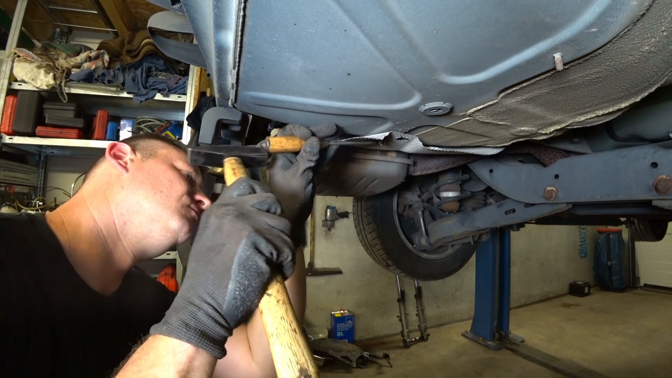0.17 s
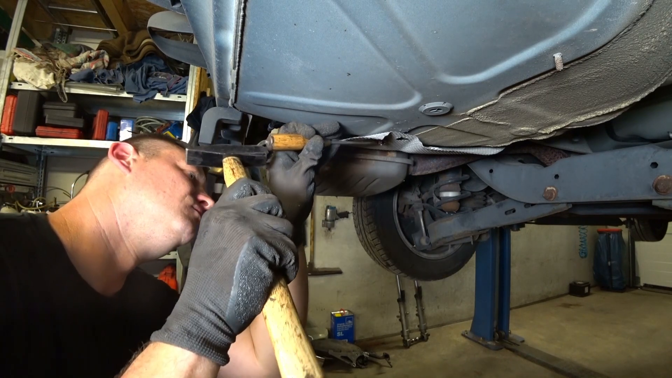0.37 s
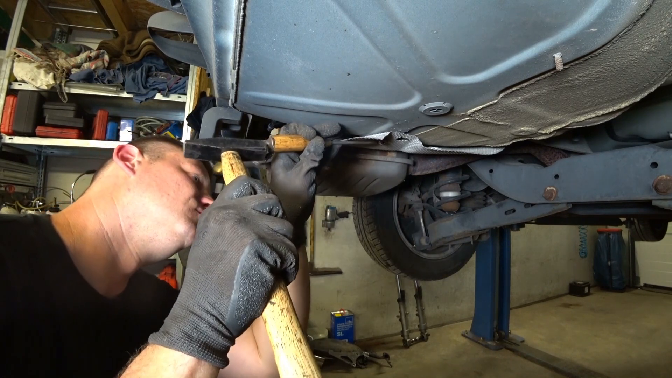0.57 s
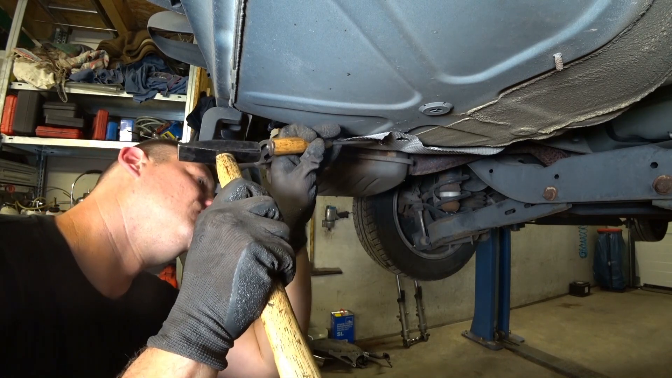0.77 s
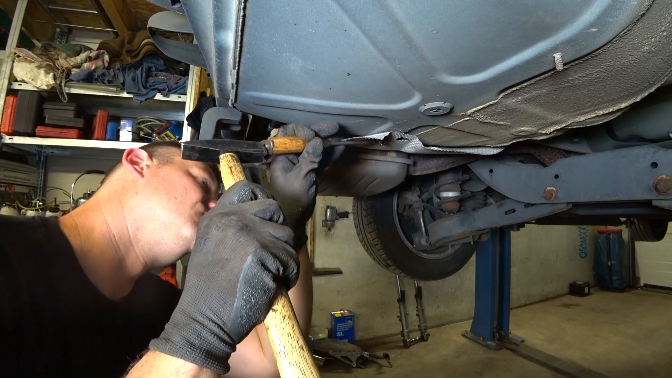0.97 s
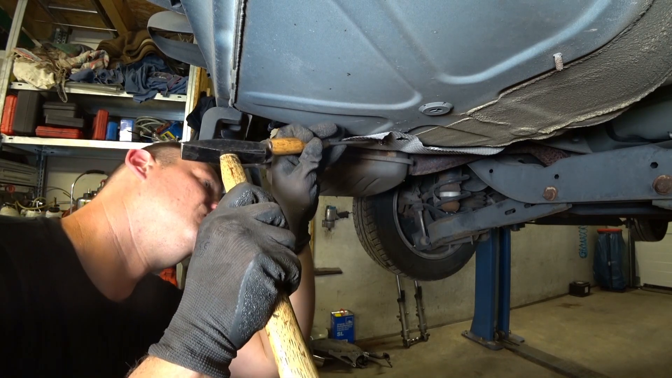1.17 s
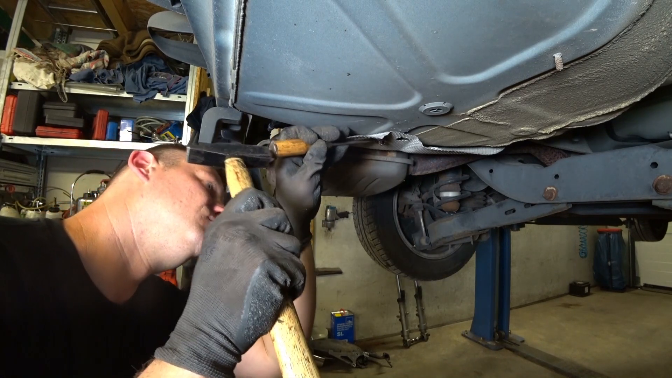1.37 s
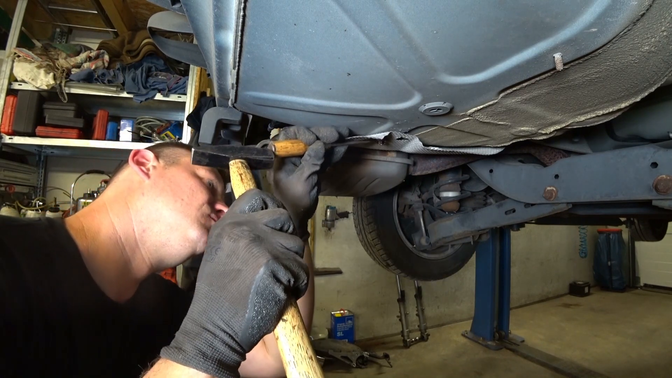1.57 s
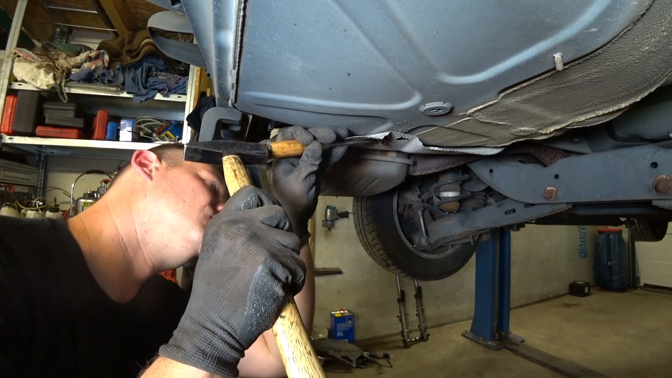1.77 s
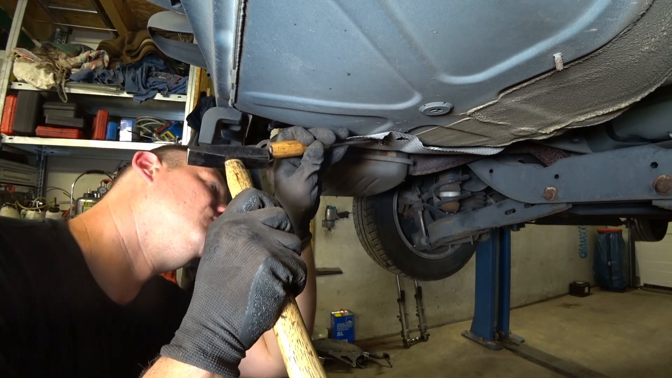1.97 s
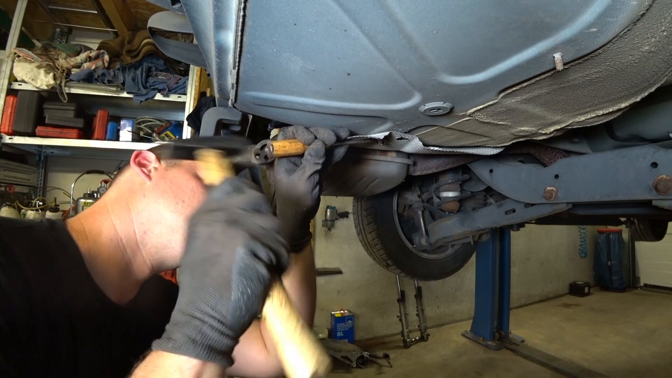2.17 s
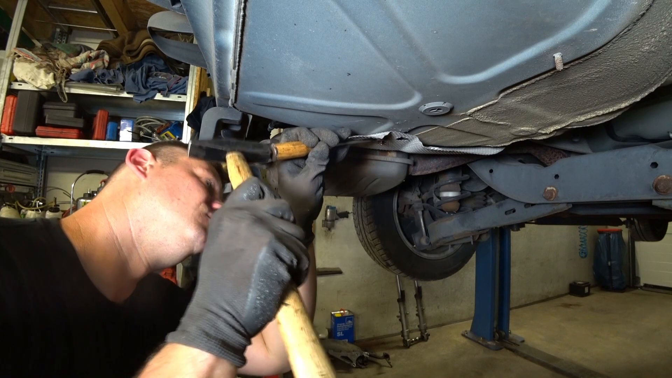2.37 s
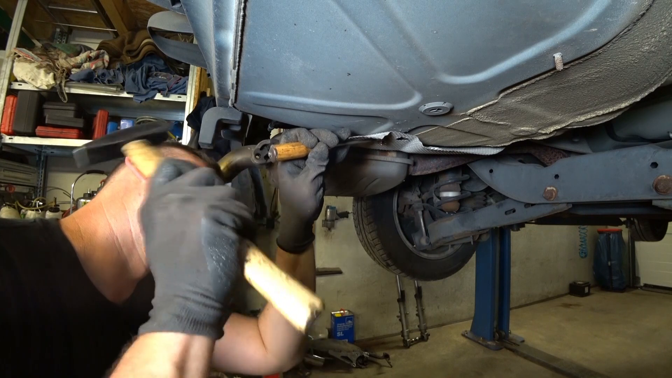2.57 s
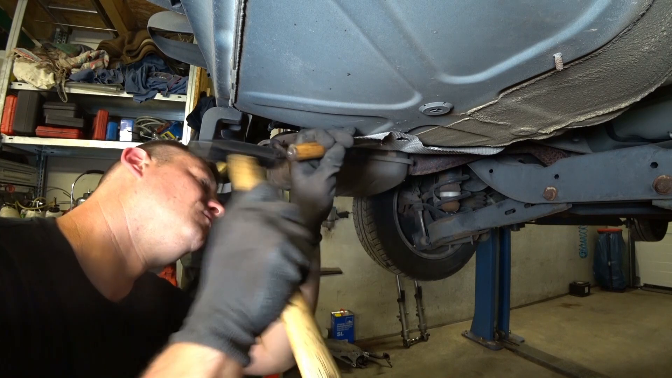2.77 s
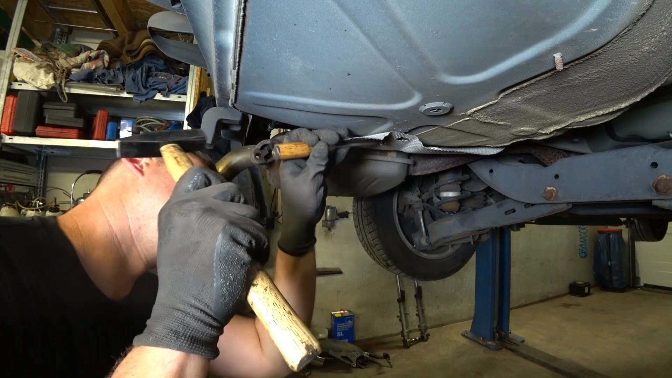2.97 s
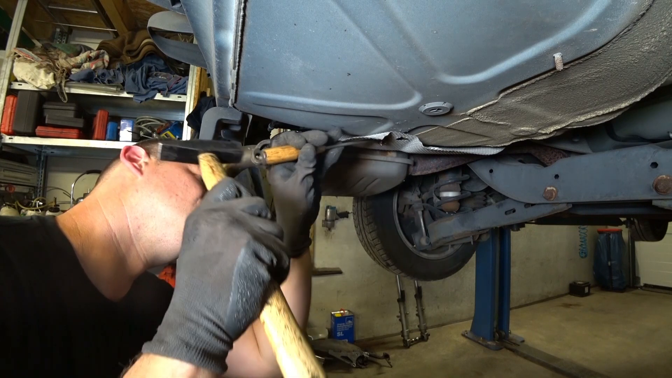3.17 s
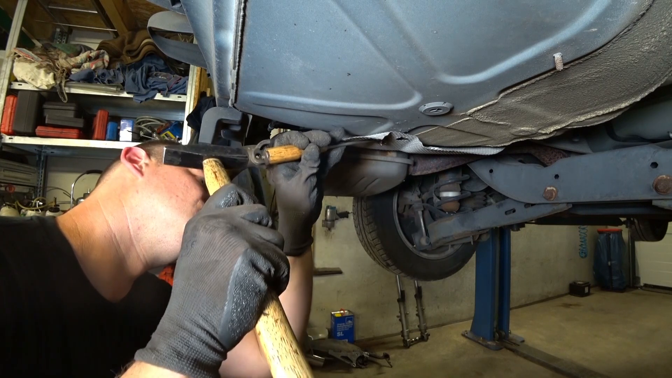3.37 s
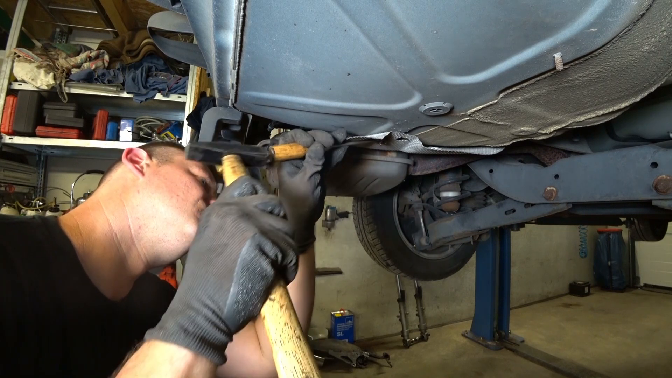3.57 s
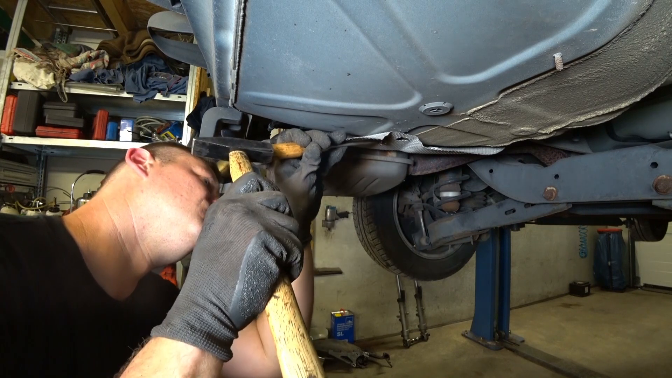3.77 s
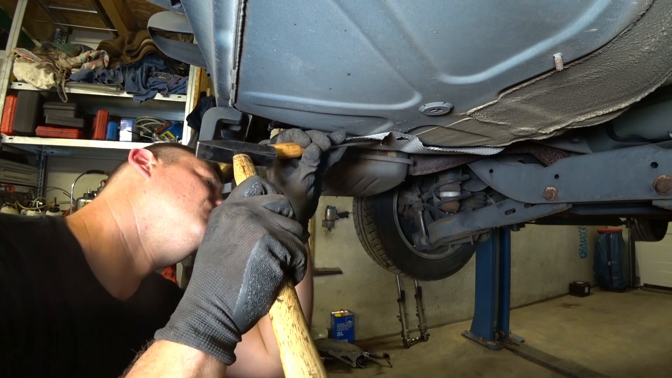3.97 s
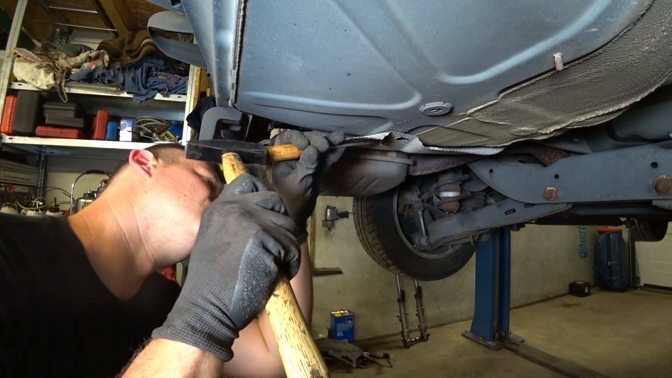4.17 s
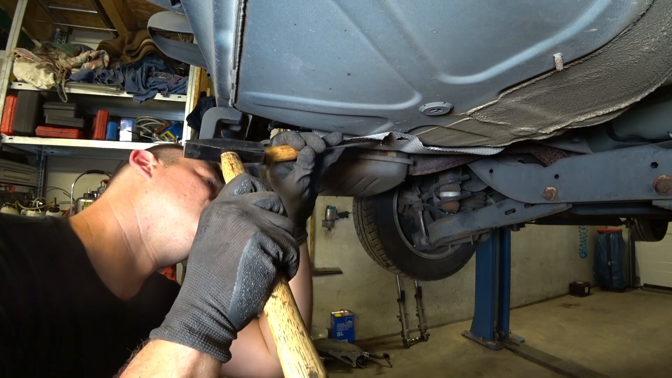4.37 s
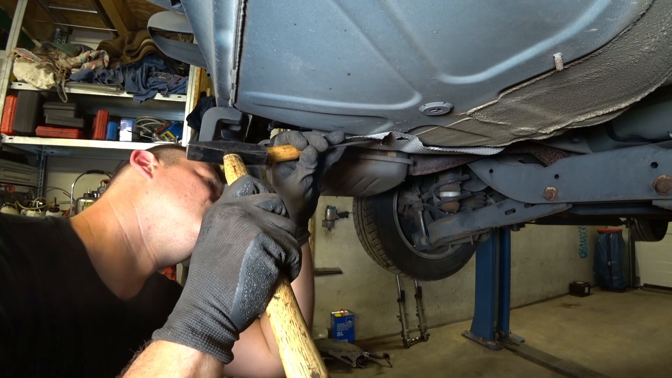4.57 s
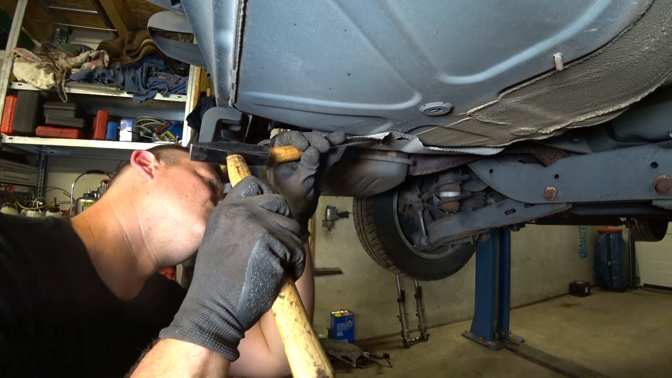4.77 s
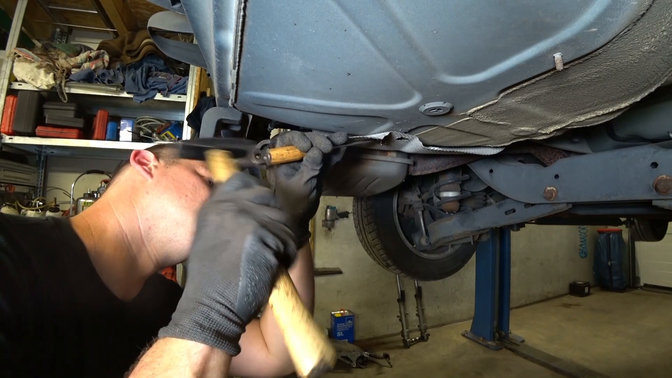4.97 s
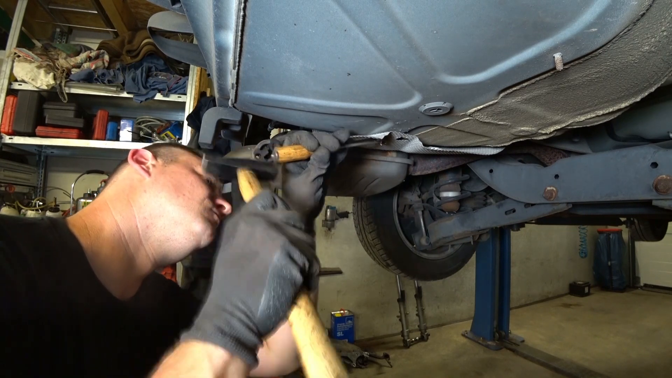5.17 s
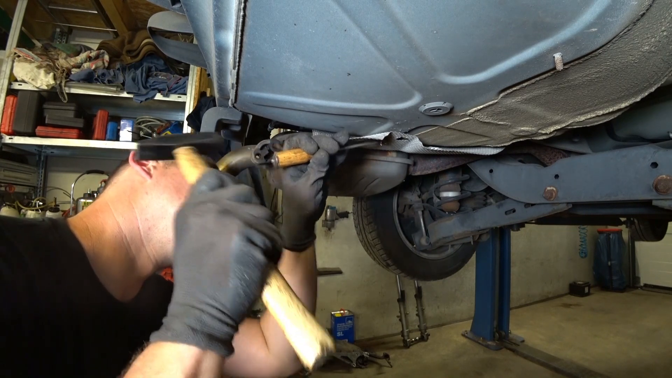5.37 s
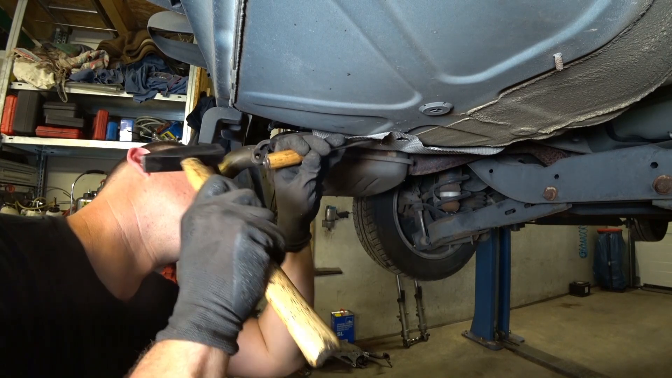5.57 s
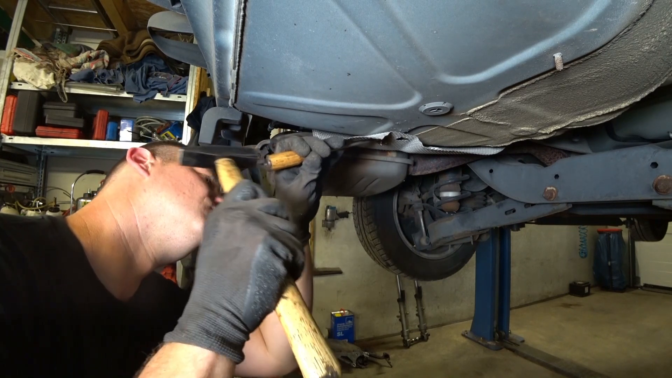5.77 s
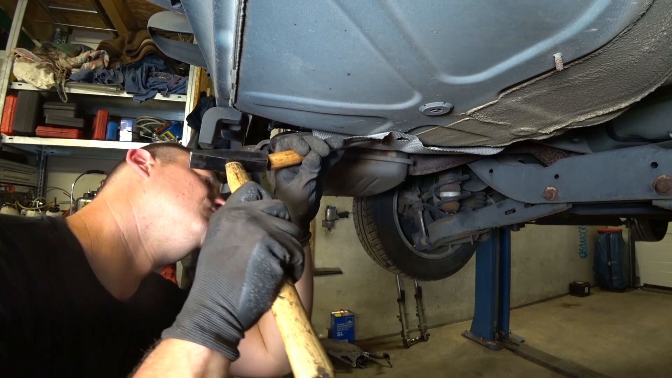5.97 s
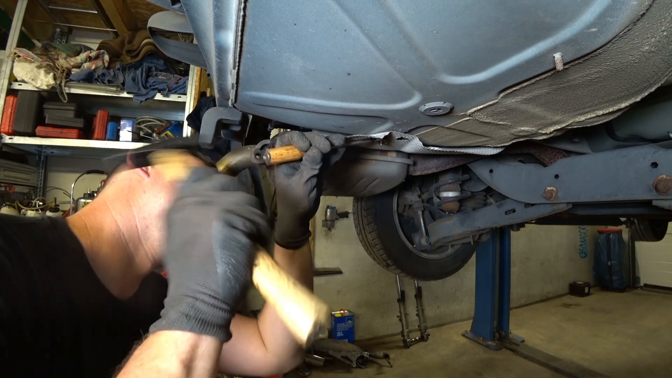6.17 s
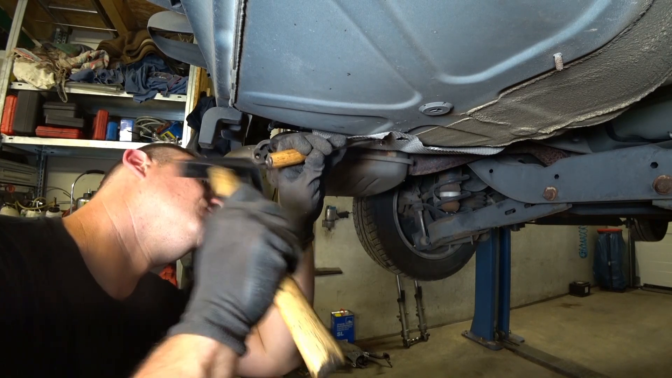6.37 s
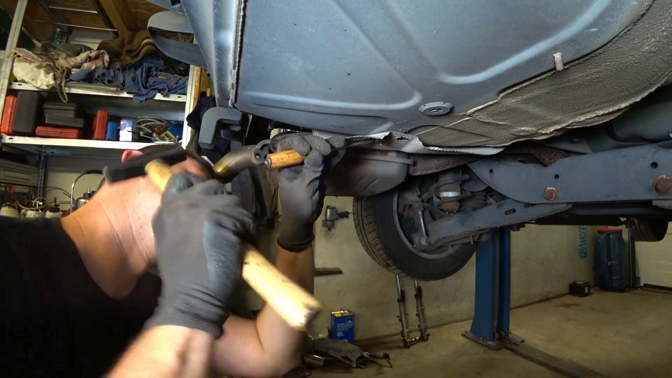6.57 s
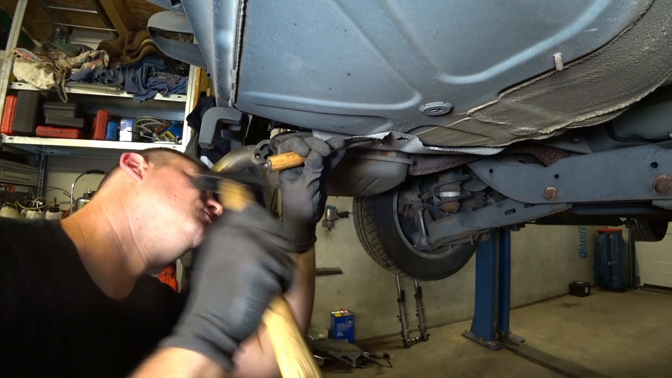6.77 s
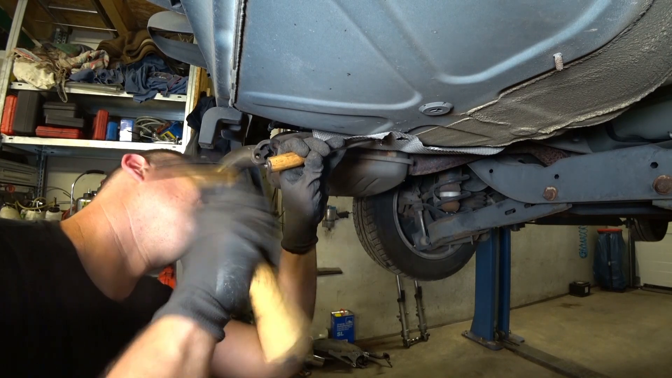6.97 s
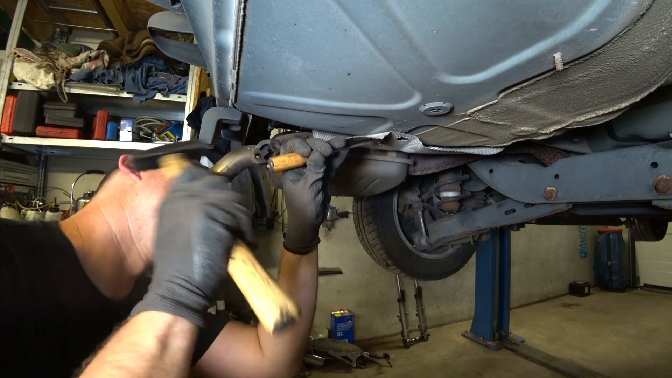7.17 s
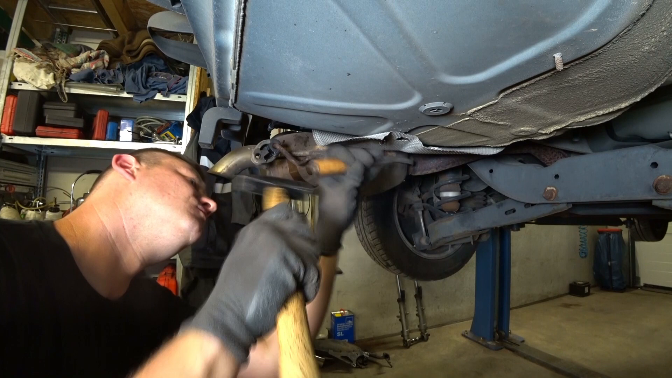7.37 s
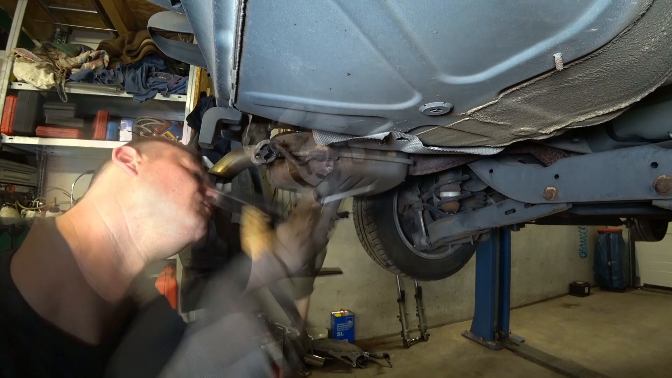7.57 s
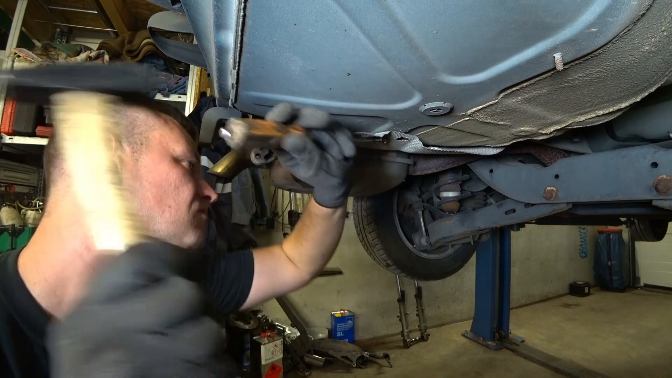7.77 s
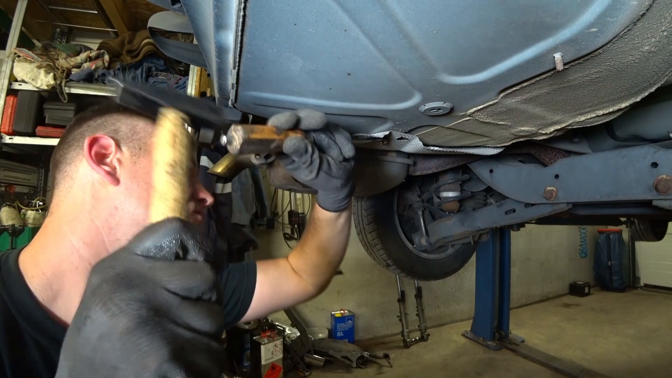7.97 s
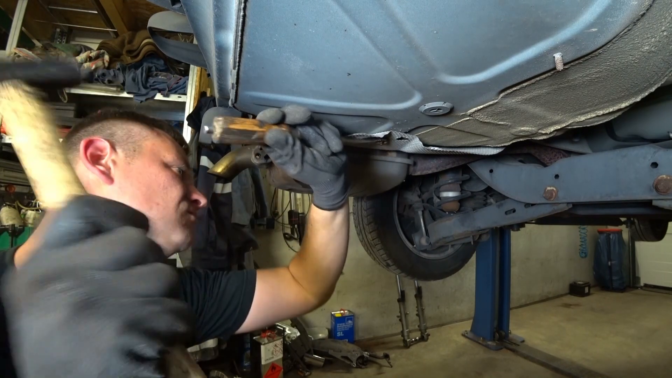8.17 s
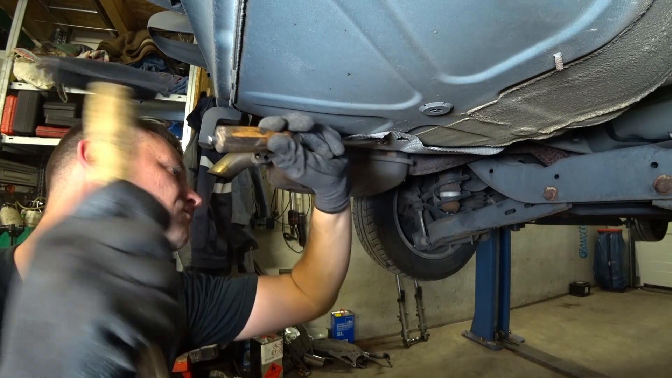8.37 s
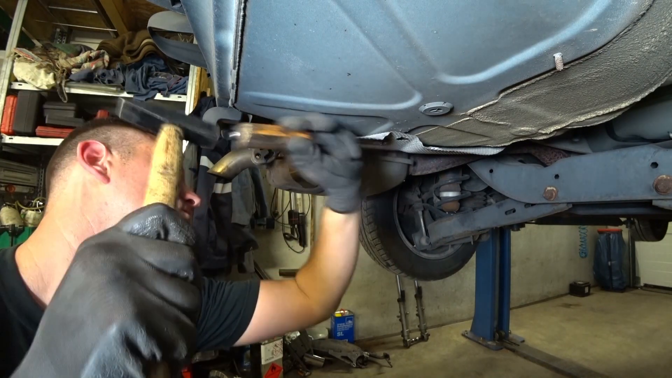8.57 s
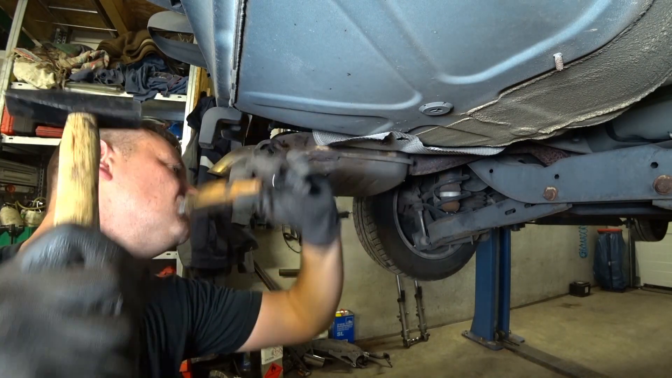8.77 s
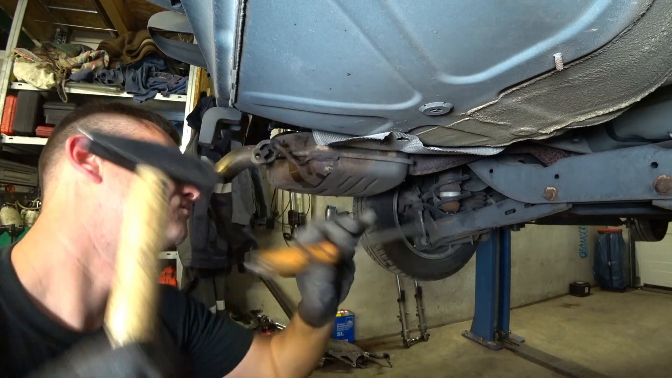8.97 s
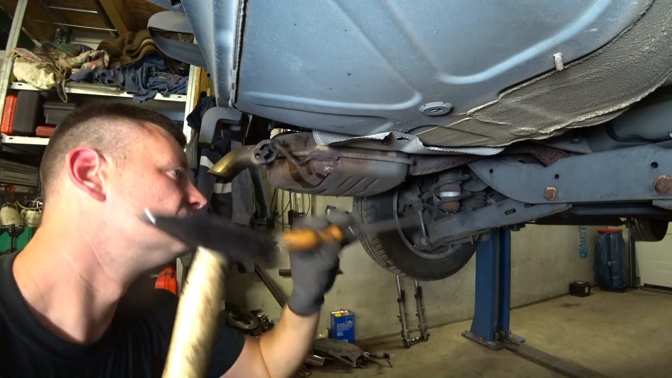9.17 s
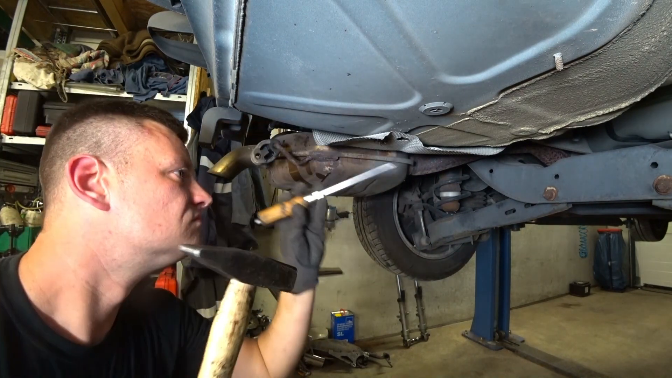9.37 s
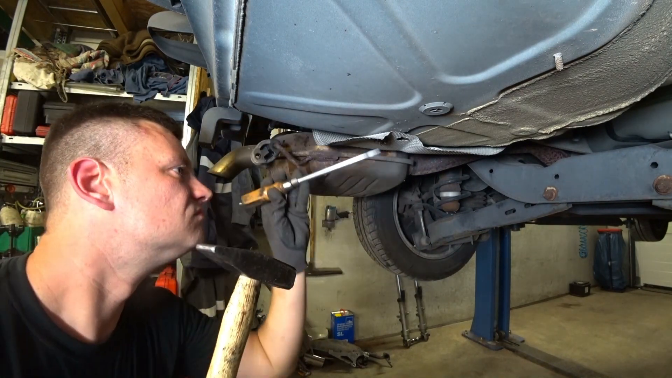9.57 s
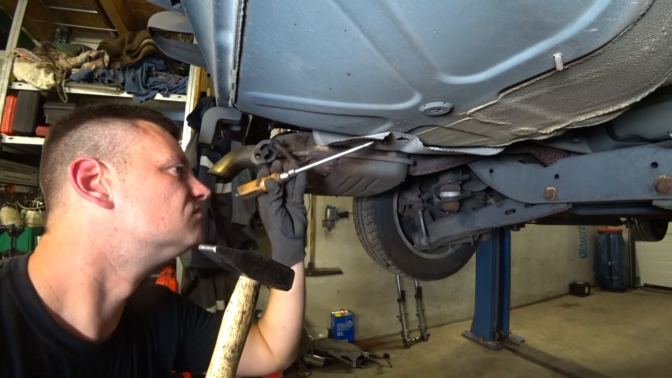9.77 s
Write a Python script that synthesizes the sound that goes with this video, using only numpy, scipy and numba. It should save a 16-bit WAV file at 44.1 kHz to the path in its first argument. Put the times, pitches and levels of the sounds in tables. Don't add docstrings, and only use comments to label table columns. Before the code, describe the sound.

In a garage, metal scrapes and bright taps come first, with short chirping rebounds. Harsh, clipped hammer blows then make the car's thin floor ring and a hollow box thrum deeply. Knocks fill the gaps before a series of heavier strikes, a brief stuttering wrench, three last clangs, and a soft closing knock. The close microphone compresses the ringing over faint air and distant rumble.

```python
import sys
import numpy as np
from scipy import signal
from scipy.fft import rfft, irfft, next_fast_len
from scipy.io import wavfile
from scipy.ndimage import uniform_filter1d, map_coordinates
from numba import njit

SR = 44100
rng = np.random.default_rng(int(sys.argv[2]) if len(sys.argv) > 2 else 0)


def magnitude_from_level(level_db):
    exponent = np.asarray(level_db, float) / 20
    return 10 ** exponent


def master(y):
    cut = np.clip(np.atleast_2d(y).T, -1, 1)
    pcm = np.round(cut * 32767)
    wavfile.write(sys.argv[1], SR, pcm.astype(np.int16))


N = 433503


def along(points, hz):
    f, value = np.transpose(points)
    return np.interp(np.log(hz + 1), np.log(f + 1), value)


def filtered(x, response):
    size = next_fast_len(N + SR // 4)
    hz = np.fft.rfftfreq(size, 1 / SR)
    return irfft(rfft(x, size) * response(hz), size)[:N]


def coloured(x, points):
    return filtered(x, lambda hz: magnitude_from_level(along(points, hz)))


# f/Hz, level/dB per Hz
AIR_SPECTRUM = [(15, -26), (25, 9.5), (301, -2), (354, 0), (427, 1.5), (516, -1.5), (754, -1), (1040, -2),
                (2990, -13.5), (11000, -24.5), (16000, -26)]
# f/Hz, level/dB per Hz
MURMUR_SPECTRUM = [(60, -14), (140, -8), (210, 1), (300, -3), (500, 0), (1200, 0), (2500, -16), (4000, -40)]
# t/s, level/dB
MURMUR_LEVEL = [(0, -43), (4.2, -56), (4.6, -73), (6.2, -59), (8.8, -41.5), (9.83, -38)]


def hush():
    air = coloured(rng.standard_normal(N), AIR_SPECTRUM)
    murmur = coloured(rng.standard_normal(N), MURMUR_SPECTRUM)
    murmur_db = np.interp(np.arange(N) / SR, *np.transpose(MURMUR_LEVEL))
    return magnitude_from_level(-47) * air / air.std() + magnitude_from_level(murmur_db) * murmur / murmur.std()


def unit(x):
    power = np.mean(x[..., :SR // 50] ** 2, axis=-1, keepdims=True)
    return x / np.sqrt(power + 1e-20)


def colour_db(hz, contacts):
    centre_hz, boom_db, edge_db = contacts[:, 2:5].T[..., None]
    bump = 6 * np.exp(-(np.log2((hz + 1) / centre_hz) / 0.52) ** 2)
    boom = boom_db / (1 + (hz / 400) ** 7)
    edge = edge_db / (1 + (2600 / (hz + 1)) ** 4)
    return bump + boom + edge


def ringing(hz, gains, t60, t):
    sines = np.sin((2 * np.pi * hz[:, None] * t % (2 * np.pi)).astype("f4"))
    decay = np.exp((-np.log(1000) / t60[:, None] * t).astype("f4"))
    return gains.astype("f4") @ (sines * decay)


def wash(gain, t60, count, size):
    hz, t, z = signal.stft(rng.standard_normal((count, size)), SR, nperseg=256)
    bands = uniform_filter1d(rng.standard_normal((count, len(hz))), size=3, axis=1) * np.sqrt(3)
    z = z * (gain(hz) * magnitude_from_level(2.2 * bands))[..., None]
    z = z * magnitude_from_level(-60 * t / t60(hz)[:, None])
    return signal.istft(z, SR, nperseg=256)[1][:, :size]


# f/Hz, width/Hz, level/dB over the sheet
TOOLS = [(2500, 700, -1), (4200, 870, -3), (6300, 510, -8)]


def tool_gain(hz, ring_db):
    lift = sum(magnitude_from_level(2 * db) / (1 + (2 * (hz - centre) / width) ** 4) for centre, width, db in TOOLS)
    return np.sqrt(1 + magnitude_from_level(2 * ring_db) * lift)


# f/Hz, level/dB per Hz
PANEL = [(40, -42), (100, -9.5), (210, -5.5), (350, -6.5), (570, -6), (1040, -3.5), (1600, -7.5),
         (2300, -16), (3500, -19.5), (5000, -21.5), (9350, -31.5), (13600, -32.5), (16000, -56)]
# f/Hz, t60/s
PANEL_T60 = [(100, 0.54), (400, 0.55), (1000, 0.44), (2500, 0.56), (5000, 0.5), (10000, 0.42),
             (16000, 0.26)]
# f/Hz, level/dB, t60/s
HOLLOWS = [(142, -22, 0.42), (215, 2.5, 0.69), (248, -20.5, 0.42), (355, -18, 0.86), (437.7, -2, 0.67),
           (518.4, -0.5, 0.56), (570, -12.5, 0.57), (810, -4, 0.81), (1190, -3.5, 0.58), (1615, -29, 0.5)]
# f/Hz, level/dB per Hz
CRACK = [(100, -25), (1000, -3.5), (2600, -2.5), (8000, -17), (16000, -28), (18500, -50)]


def strike(contacts, ring_db, held_t60, rise_s, room_db, build_s, hollow_db,
           crack_db, crack_t60, dull_db, edge_share, seconds):
    t, count, short = np.arange(int(SR * seconds)) / SR, len(contacts), SR // 10
    soft = contacts * [1, 1, 1, 1, edge_share]

    def sheet(f):
        return magnitude_from_level(along(PANEL, f) + colour_db(f, soft)) * tool_gain(f, ring_db)

    def crack_gain(f):
        dulling = dull_db / (1 + (6500 / (f + 1)) ** 4)
        return magnitude_from_level(along(CRACK, f) + colour_db(f, contacts) - dulling)

    hz = np.sort(rng.uniform(180, 3400, size=220))
    lasting = along(PANEL_T60, hz) * np.exp(0.13 * rng.standard_normal(len(hz)))
    uneven = magnitude_from_level(1.5 * rng.standard_normal((count, len(hz))))
    uneven = uneven * rng.standard_normal((count, len(hz)))
    sound = unit(ringing(hz, sheet(hz) * uneven, lasting, t))

    f, db, t60 = np.transpose(HOLLOWS)
    spread_db = 3.4 * rng.standard_normal((count, len(f)))
    sound += ringing(f, magnitude_from_level(hollow_db + db + colour_db(f, soft) + spread_db), t60, t)
    sound *= magnitude_from_level(-60 * t / held_t60)

    room = unit(wash(sheet, lambda f: along(PANEL_T60, f), count, len(t)))
    sound += magnitude_from_level(room_db) * room * (1 - np.exp(-t / build_s))
    crack = unit(wash(crack_gain, lambda f: 1e3 + f, count, short))
    sound[:, :short] += magnitude_from_level(crack_db - 60 * t[:short] / crack_t60) * crack
    sound *= 1 - np.exp(-(t / rise_s) ** 1.2)

    out = np.zeros(N + SR)
    for (s, db, *_), one in zip(contacts, sound):
        out[round(s * SR):][:len(t)] += magnitude_from_level(db) * one
    return out[:N]


def pull(count=7):
    start_s, gap_s = 7.653, 0.0293
    boom_db, edge_db, held_t60 = -28, -17, 0.25
    k = np.arange(count)
    db = -8 + 4.5 * np.sin(np.pi * (k + 1) / (count + 1))
    hz = 1100 * np.exp(0.2 * rng.standard_normal(count))
    return [(start_s + gap_s * i, db[i], hz[i], boom_db, edge_db, held_t60) for i in k]


# t/s, level/dB, brightest panel region f/Hz, held ring t60/s
SLIDES = [(0.009, -36, 1110, 0.35), (0.085, -27.5, 799, 0.33), (0.175, -13, 775, 0.37),
          (0.248, -13, 820, 0.18), (0.284, -14, 1020, 0.35), (0.371, -12.5, 1180, 0.34),
          (0.41, -3.5, 1530, 0.21), (0.68, -8, 1270, 0.5), (1.189, -19, 1190, 0.3),
          (1.223, -10, 1160, 0.34), (1.608, -1.5, 1010, 0.48), (1.799, -23.5, 826, 0.33),
          (1.884, -18, 940, 0.24), (2.079, -18, 980, 0.38), (3.056, -14.5, 1030, 0.45),
          (3.689, -13.5, 1030, 0.28), (3.954, -33.5, 912, 0.38), (4.034, -15.5, 1190, 0.25),
          (4.313, -31.5, 745, 0.16), (5.442, -4, 745, 0.5), (5.559, -19, 748, 0.17)]


def slides():
    boom_db, edge_db = -29, -31
    settle = [(s, db, hz, boom_db, edge_db, t60) for s, db, hz, t60 in SLIDES]
    rows = np.array(settle + pull()) + [0, -2, 4, 22, 19, 0]
    return magnitude_from_level(-4) * strike(
        rows[:, :5], ring_db=-0.5, held_t60=rows[:, 5:], rise_s=0.017, room_db=-5.5, build_s=0.04,
        hollow_db=-12, crack_db=-3.5, crack_t60=0.13, dull_db=7, edge_share=1, seconds=0.54)


def singing(rows, steady, rough):
    out, t = np.zeros(N + SR), np.arange(SR * 2 // 3) / SR
    knots = rng.standard_normal((len(rows), 2, SR // 8))
    for (s, hz, width_hz, db, t60), (a, b) in zip(rows, knots):
        wander = map_coordinates(a, [t * width_hz]) + 1j * map_coordinates(b, [t * width_hz])
        waver = steady + rough * wander
        ring = np.imag(waver * np.exp(2j * np.pi * hz * t)) * (1 - np.exp(-t / 0.0014))
        out[round(s * SR):][:len(t)] += magnitude_from_level(db - 60 * t / t60) * ring
    return out[:N]


# t/s, level/dB
LIP = [(450, -11, 0.62), (1280, -9, 0.3), (1496, 0.5, 0.29), (2950, -24, 0.35)]
LIP_HITS = [
    (0.423, -16.5),
    (0.941, -8),
    (1.618, -20),
]
SILL = [(216, 1, 0.32), (264, -9, 0.25), (536, -1.5, 0.51)]
SILL_HITS = [
    (2.331, 3),
    (5.145, 2.5),
    (6.279, -1),
    (6.659, -4),
    (7.297, -3),
]
SEAM = [(838, 0, 0.5), (1022, -1.5, 0.56), (1190, -8, 0.6)]
SEAM_HITS = [
    (2.678, 12.5),
    (3.458, -9.5),
]
BRACKET = [(351, -10, 0.7), (415, -7, 0.52), (586, -13, 0.63), (800, 3, 0.36), (1190, -8, 0.5)]
BRACKET_HITS = [
    (7.75, -22),
    (7.959, -2),
    (8.253, 0.5),
    (8.536, -3),
]
BOX = [(205, 1, 0.17), (412, -8.5, 0.33)]
BOX_HITS = [
    (0.186, -26),
    (1.947, -24),
    (3.221, -24.5),
    (3.458, -14),
    (3.711, -29),
    (4.767, -30),
    (5.855, -20),
    (9.458, -33),
    (9.495, -35),
    (9.645, -18.5),
]
# t/s, f/Hz, level/dB, t60/s
LONE = [(0.186, 832, -16, 0.18), (0.692, 1200, -10, 0.23), (1.947, 474, -22, 0.3), (6.993, 600, 0.5, 0.36),
        (6.992, 1100, -2, 0.55), (6.993, 420, -4.5, 0.49), (8.536, 380, -9, 0.78),
        (3.458, 450, -14.5, 0.57), (3.46, 1190, -5.5, 0.57), (7.7, 586, -18, 0.9), (7.72, 345, -23.5, 0.86),
        (0.186, 330, -27.5, 0.2), (3.7, 560, -31.5, 0.32)]
# t/s, f/Hz, level/dB, t60/s
HEAD = [
    (5.145, 9528, -23, .45),
    (7.296, 9528, -31, .4),
    (8.253, 11725, -22, .45),
    (8.534, 11750, -32, .4),
]
# t/s, f/Hz, level/dB
CLUSTERS = [(0.11, 4250, -50), (0.41, 4340, -35), (0.69, 2930, -30), (1.618, 2260, -22.5),
            (1.947, 1950, -16), (2.331, 4530, 3.5), (2.331, 6850, -14), (3.114, 1720, -13.5),
            (3.458, 2150, -8.5), (5.145, 4560, -0.5), (5.145, 2700, -6.5), (5.65, 7000, -44),
            (5.855, 4580, -24), (5.855, 2800, -26), (6.279, 4620, -2.5), (6.279, 2620, -5),
            (6.993, 4550, -3), (6.993, 2393, -0.5), (7.296, 2650, -2.5), (7.296, 4120, -1.5),
            (7.652, 1150, -20), (7.76, 851, -13.5), (8.253, 9800, -22), (8.253, 13600, -23),
            (8.534, 2700, -4), (9.646, 2240, -24.5), (7.296, 1950, -2), (6.659, 5500, -22),
            (6.659, 2900, -18), (3.458, 6100, -26), (5.145, 6100, -10), (2.678, 3500, -14),
            (2.678, 4500, -12), (3.458, 4680, -23), (2.678, 2050, -3), (6.279, 1900, -6), (6.993, 1900, -6),
            (2.678, 1150, 9), (3.47, 1150, -5), (6.7, 2300, -18)]
# t/s, centre f/Hz, level/dB
GRIT = [(0.288, 5500, -35), (0.288, 10500, -40), (0.508, 4500, -30), (1.277, 4970, -44), (3.476, 6960, -26),
        (3.69, 9600, -43), (4.055, 4990, -42), (4.335, 5350, -42), (6.74, 6000, -22), (8.115, 6450, -21),
        (8.115, 13000, -36)]


def rings():
    spots = [(LIP, LIP_HITS), (SILL, SILL_HITS), (SEAM, SEAM_HITS), (BRACKET, BRACKET_HITS), (BOX, BOX_HITS)]
    struck = []
    for modes, hits in spots:
        for s, db in hits:
            struck += [(s, hz, db + own_db, t60) for hz, own_db, t60 in modes]
    parts = [(s, hz, 45, db, t60) for s, hz, db, t60 in struck + LONE + HEAD]
    tight = [(s, hz, 580, db, max(0.51 + 0.03 * db, 0.08)) for s, hz, db in CLUSTERS]
    grit = [(s, hz, 0.58 * hz, db, 0.085) for s, hz, db in GRIT]
    return singing(parts, steady=1, rough=0.73) + singing(tight + grit, steady=0, rough=1)


# t/s, level/dB, brightest panel region f/Hz, edge level/dB, held ring t60/s
TAPS = [(0.423, -2, 1550, -31, .6), (0.509, -16, 1600, -23, 0.73), (0.689, -3.5, 1300, -28.5, 0.66),
        (0.941, 0.5, 1600, -20.5, 1.2), (1.089, -19, 1470, -36, 0.88), (1.279, -30, 1200, -15, .7),
        (1.456, -10, 1190, -56, 0.95), (1.618, -8, 1050, -32, .75), (2.12, -18.5, 1210, -51, .75),
        (3.114, -1.5, 1680, -25.5, 0.5), (3.475, 7.5, 1250, -32, .85), (3.711, -24, 1030, -33, .75),
        (4.615, -16.5, 600, -120, 0.21), (4.91, -9, 1050, -27, 0.25), (5.471, -10.5, 1200, -27.5, 0.66),
        (8.178, -5, 1140, -25.5, .7), (9.738, -19.5, 1200, -9, 0.73)]
# t/s, level/dB, brightest region f/Hz, boom level/dB, edge level/dB
KNOCKS = [(0.887, -20, 1500, -9, -38), (1.726, -11.5, 785, -17, -50), (1.947, -4, 776, -13.5, -36),
          (3.186, -10.5, 1460, -17, -31), (3.221, -5, 1020, -16, -53), (4.338, -29.5, 735, -15, -40),
          (4.546, -40, 1010, -6, -42), (4.768, -23.5, 560, 6, -75), (5.656, -5.5, 1140, -11, -31.5),
          (5.755, -10, 953, -11, -40), (5.79, -9, 1120, -13, -38), (5.819, -21, 1410, -9, -12),
          (5.855, -3.5, 1470, -5, -20), (8.12, -23, 664, -10, -8), (9.459, -36.5, 510, 2, -39),
          (9.646, -10, 565, -4, -23), (9.824, -15, 604, -3, -24)]


def taps():
    tap_boom_db, knock_t60 = -24.5, 0.64
    tight = [(s, db, hz, tap_boom_db, edge_db, t60) for s, db, hz, edge_db, t60 in TAPS]
    deep = [(*knock, knock_t60) for knock in KNOCKS]
    rows = np.array(tight + deep) + [0, -3.5, 30, 11.5, 17, 0]
    return magnitude_from_level(-6.5) * strike(
        rows[:, :5], ring_db=4, held_t60=rows[:, 5:], rise_s=0.00084, room_db=-7.5, build_s=0.0033,
        hollow_db=-13, crack_db=1.5, crack_t60=0.088, dull_db=3, edge_share=0.93, seconds=0.5)


# t/s, f/Hz, level/dB, t60/s
REBOUNDS = [(0.423, 1460, -5, 0.09), (0.424, 1780, -10, 0.1), (0.72, 1280, -15, 0.09),
            (0.748, 1300, -22, 0.06), (0.888, 1500, -23, 0.15), (0.934, 1700, -22, 0.05),
            (0.941, 1270, -10, 0.1), (0.941, 1720, -6, 0.09), (0.957, 1480, -4, 0.07),
            (0.975, 1300, -5, 0.076), (0.979, 1520, -6, 0.065), (1.457, 1750, -21, 0.074),
            (1.468, 1100, -14.5, 0.12), (1.645, 1000, -10, 0.08), (1.726, 800, -12, 0.08),
            (1.955, 1100, -13, 0.09), (2.123, 1245, -21, 0.08), (2.69, 1270, 2, 0.9), (2.685, 1497, 4, 0.2),
            (3.114, 1715, -7, 0.12), (3.47, 1280, -7, 0.5), (4.392, 1100, -36, 0.12),
            (4.768, 480, -27, 0.1), (5.001, 1000, -29, 0.1), (5.719, 1150, -22, 0.08),
            (5.79, 850, -8, 0.03), (5.856, 4600, -16, 0.06), (5.88, 402, -16, 0.14),
            (7.652, 1250, -16.5, 0.4), (7.652, 421, -25.5, 0.4), (4.911, 1077, -10, 0.075),
            (4.616, 997, -25, 0.064), (0.509, 1590, -19, 0.1), (0.95, 3220, -32, 0.4),
            (8.55, 2750, -9, 0.59), (7.76, 328, -21, 0.3), (3.451, 1200, -15, 0.03),
            (1.948, 1950, -14, 0.12), (7.79, 900, -12, 0.2), (7.97, 760, -3, 0.25),
            (7.705, 590, -13.5, 0.2), (7.79, 1350, -13, 0.2), (7.96, 775, 8, 0.06), (8.0, 1200, -8, 0.3),
            (8.18, 1200, -11, 0.22), (9.646, 1510, -21, 0.08), (9.668, 449, -19.5, 0.12),
            (9.705, 201, -21, 0.13), (9.739, 2500, -26.5, 0.15), (9.75, 1304, -26, 0.15)]
# t/s, level/dB
JOLTS = [
    (0.423, -29),
    (0.689, -27),
    (0.941, -26),
    (4.91, -33),
    (9.646, -28),
]


def rebounds():
    chirrup_width_hz, jolt_hz, jolt_t60 = 76, 45, 0.12
    rows = [(s, hz, chirrup_width_hz, db, t60) for s, hz, db, t60 in REBOUNDS]
    jolts = [(s, jolt_hz, jolt_hz / 2, db, jolt_t60) for s, db in JOLTS]
    return singing(rows + jolts, steady=0.9, rough=0.5)


# t/s, level/dB, brightest panel region f/Hz, boom level/dB, edge level/dB
BLOWS = [(2.331, 3, 824, 0.5, -1), (2.678, 7.5, 1230, -10.5, -5), (3.458, -14, 1190, -6, -12),
         (5.145, 3, 820, -1.5, -3), (6.279, -1, 810, 1.5, 2.5), (6.659, -5, 800, 5, -14.5),
         (6.993, -5.5, 1010, 2, 4), (7.296, -7, 1400, 3, 5), (7.959, -9.5, 790, 2.5, -8.5),
         (8.253, -4, 860, -3.5, 0.5), (8.535, -3, 1150, -3, 4.5)]


def blows():
    headroom_db = 26.5
    return magnitude_from_level(headroom_db - 14.5) * strike(
        np.array(BLOWS), ring_db=-0.5, held_t60=1.16, rise_s=0.001, room_db=1, build_s=0.04,
        hollow_db=-12, crack_db=2.5, crack_t60=0.047, dull_db=2.5, edge_share=0.91, seconds=0.9)


# t/s, level/dB
THRUM = [
    (2.331, -7.5),
    (2.678, -21),
    (5.144, -10),
    (6.277, -10),
    (6.659, -14),
    (6.991, -14),
    (7.295, -19.5),
]


def thrum():
    out, t = np.zeros(N + SR), np.arange(SR) / SR
    ring = np.sin(2 * np.pi * 84 * t) * magnitude_from_level(-60 * t / 1.24) * (1 - np.exp(-t / 0.02))
    for s, db in THRUM:
        out[round(s * SR):][:SR] += magnitude_from_level(db) * ring
    return out[:N]


PAN_MODES = [600.4, 919, 1037, 1270.4, 1495, 1700, 1936, 2142, 2527, 2774, 3360, 4217, 4500, 4720]


def floor_pan(x):
    width_hz, level_db = 28, -1.5

    def response(f):
        modes = sum(1j * f * width_hz / (c * c - f * f + 1j * f * width_hz) for c in PAN_MODES)
        return 1 + magnitude_from_level(level_db) * modes

    return filtered(x, response)


def scene():
    contacts = floor_pan(slides() + taps() + blows())
    return (hush() + contacts + rings() + rebounds() + thrum())[None]


@njit
def follow(level, attack, release):
    out, held = np.empty_like(level), 0.0
    for i in range(len(level)):
        held += (attack if level[i] > held else release) * (level[i] - held)
        out[i] = held
    return out


def gain_control(x, knee_db, attack_s, release_s, slope, sharpness):
    held = follow(np.abs(x), 1 / (attack_s * SR), 1 / (release_s * SR))
    return x * (1 + (held / magnitude_from_level(knee_db)) ** sharpness) ** (-slope / sharpness)


def band_limit(x):
    return signal.sosfilt(signal.butter(12, 16340, fs=SR, output="sos"), x)


# f/Hz, level/dB
TREBLE_END = [(14000, 1), (15600, -6), (16100, -24), (17500, -38), (19000, -55)]


def record(dry):
    x = signal.lfilter(*signal.butter(2, 70, "high", fs=SR), dry[0])
    x = gain_control(x, knee_db=-8.5, attack_s=0.0012, release_s=0.035, slope=0.96, sharpness=2.04)
    drive = 1.035
    x = drive * x / (1 + np.abs(x / drive) ** 16) ** (1 / 16)
    mix = coloured(x, TREBLE_END)[None]
    return band_limit(mix)


dry = scene()
out = record(dry)
master(out)
```